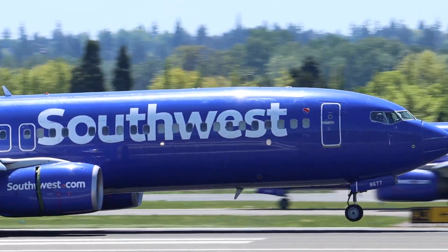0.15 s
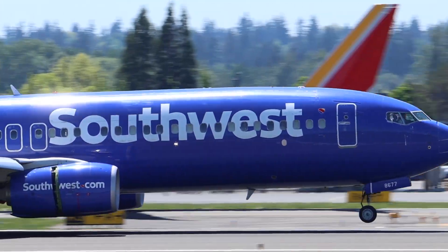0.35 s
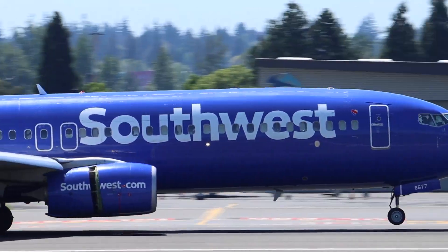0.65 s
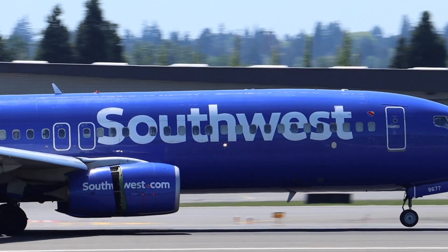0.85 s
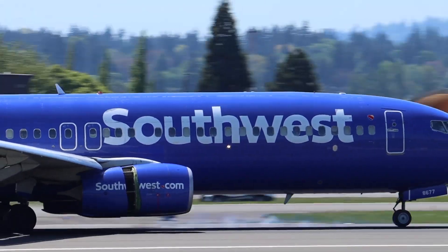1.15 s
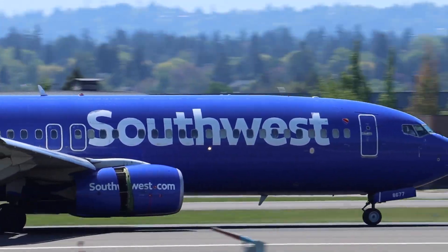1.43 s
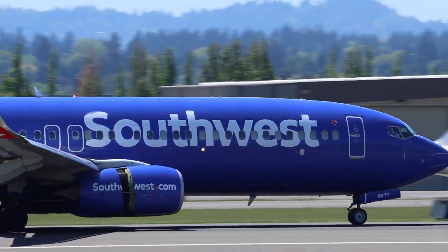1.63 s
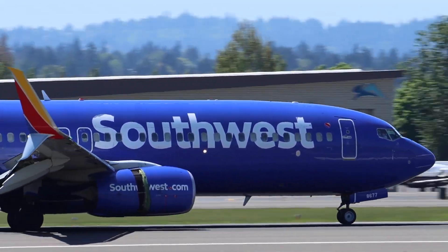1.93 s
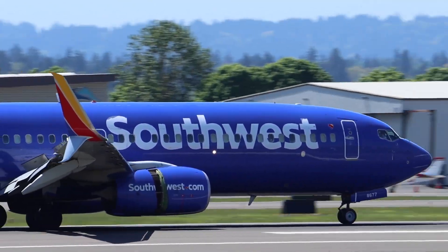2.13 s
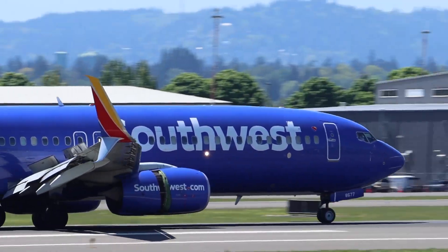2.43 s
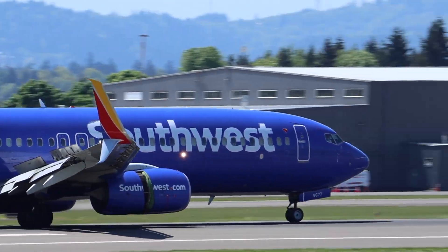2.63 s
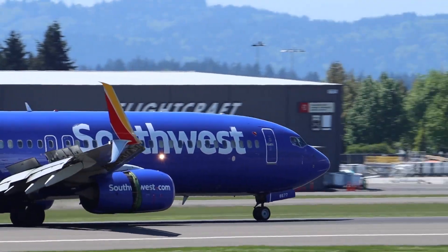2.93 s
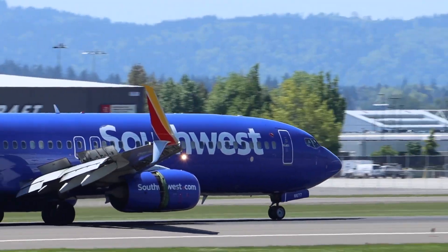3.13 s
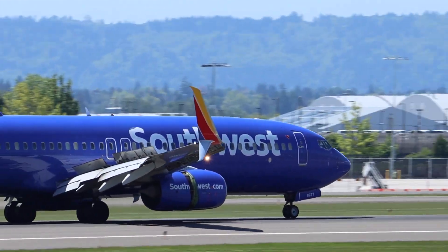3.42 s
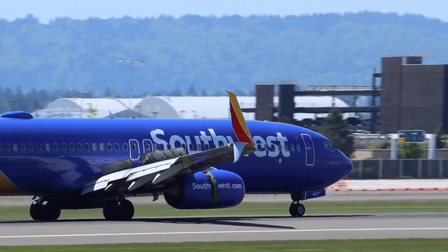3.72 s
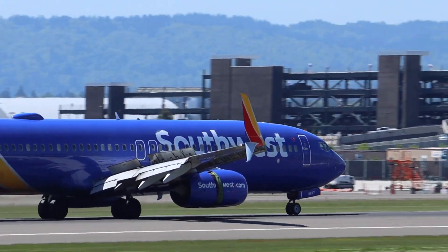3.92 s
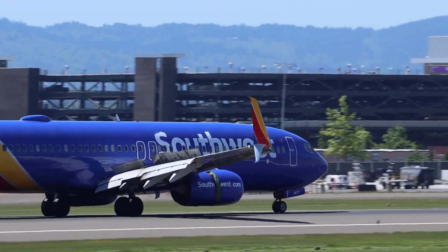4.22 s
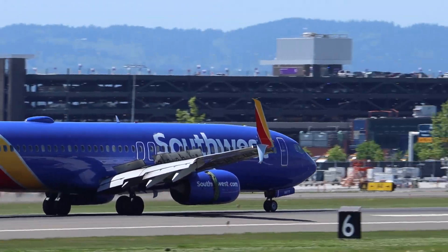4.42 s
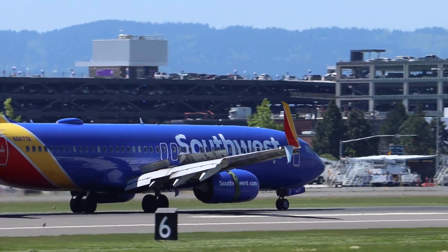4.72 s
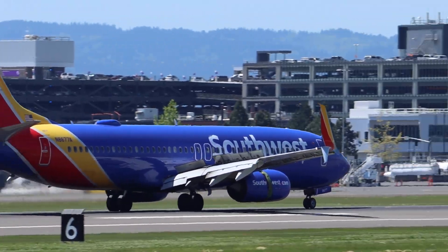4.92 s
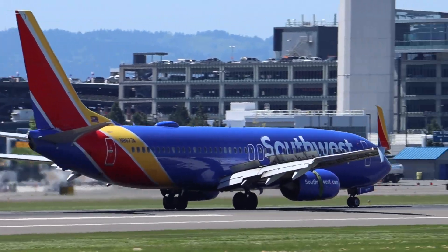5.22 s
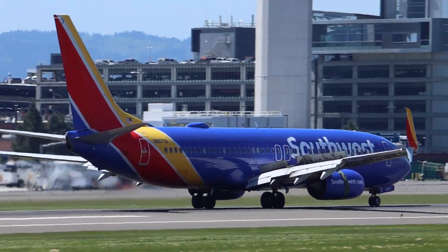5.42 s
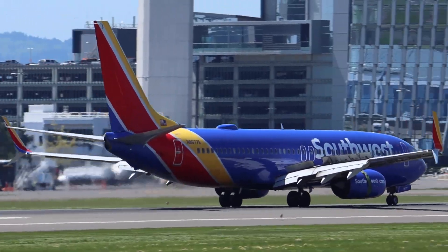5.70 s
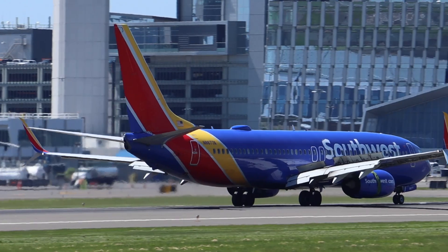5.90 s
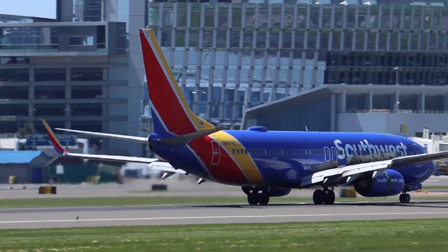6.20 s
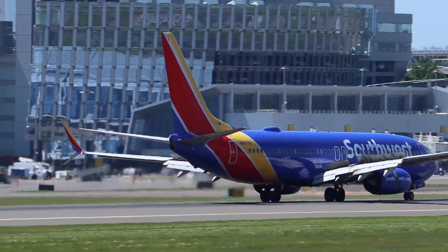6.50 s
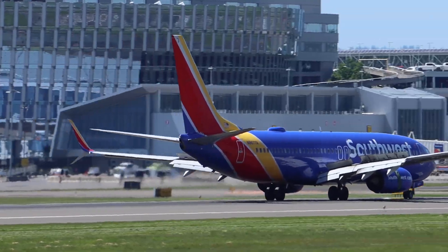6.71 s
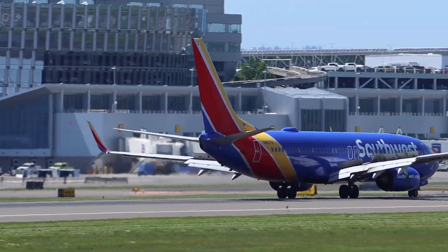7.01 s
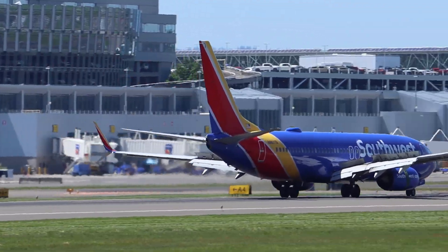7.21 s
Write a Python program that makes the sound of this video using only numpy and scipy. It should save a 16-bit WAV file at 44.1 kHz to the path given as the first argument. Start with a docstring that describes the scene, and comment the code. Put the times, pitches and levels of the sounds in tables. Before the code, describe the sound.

A landed jet airliner's turbulent roar swells unevenly with faint crackle over a deep, surging rumble, gradually losing its treble as it rolls away.

```python
"""A turbulent jet roar with a faint crackle swells and fades over a deep rumble: a twin-engine airliner
has landed and rolls past with its thrust reversers open, heard from across the field.
The roar is shaped noise plus clumps of tiny pressure jumps; a weak, late copy acts as the ground echo.
Its colour slides down in pitch and loses treble as the aircraft rolls away. The rumble is low noise
that surges and sags, and a faint, steady, dull noise is the distant airport."""
import sys
import numpy as np
from scipy import signal
from scipy.fft import rfft, irfft
from scipy.io import wavfile
from scipy.ndimage import uniform_filter1d

SR = 44100
rng = np.random.default_rng(int(sys.argv[2]) if len(sys.argv) > 2 else 0)


def dump_mix(stems):
    """Bounce the given channels to the path in sys.argv[1] as a 16-bit WAV at rate SR."""
    frames = np.atleast_2d(stems).T  # one column per channel
    limited = np.clip(frames, -1, 1)  # hard clip at full scale
    pcm = np.round(limited * 32767).astype(np.int16)
    wavfile.write(sys.argv[1], SR, pcm)


N = 324135   # length in samples

# How the large, slow eddies further down the plume change in loudness.
# Each row: time in seconds, relative level of the low roar in dB, relative level of the deep rumble in dB.
PLUME_LEVELS = [(0, -50, -39.5), (1.78, -37.5, -36.5), (3.25, -40.5, -34.5), (3.92, -35, -35.5),
                (4.16, -33, -30.5), (5.2, -31, -30), (5.8, -28, -30.5), (6.05, -33.5, -32),
                (6.68, -26.5, -29.5), (7.35, -28.5, -33)]


def jet(crackle_db):
    """Jet noise comes from turbulent mixing; small pressure jumps crackle and the ground adds an echo."""
    # How far each part of the roar drifts to the right. Each row: frequency in Hz, share of the full drift.
    lean_share = [(130, .1), (260, .65), (420, .55), (620, 1.1), (1400, 1.4), (2500, 0.35), (4300, 0.027)]
    # Phase lead of the left channel in the top treble. Each row: frequency in Hz, lead in radians.
    left_lead = [(6700, 0), (7300, 0.63), (9000, 0.6)]
    # How much the two channels differ, most in the top treble. Each row: frequency in Hz, # side level against
    # the middle in dB (lowered further towards the treble below).
    side_level = [(200, -21), (600, -24), (2000, -22.5), (6700, -23.5), (7300, -15), (10000, -9)]
    full_lean_db_per_s = 0.23   # right against left, where the share is 1

    mixing = rms_one(ground_echo(rng.standard_normal(N)))
    crackle = shocklets(per_s=560, size_db=2.5, clump_db=3.0)
    side_noise = rng.standard_normal(N)
    # Split the sounds into frequencies and short moments, so that each can get its own level.
    hz, s, (mixing, crackle, side_noise) = signal.stft(
        [mixing, crackle, side_noise], SR, nperseg=1024, noverlap=768)
    hz = np.maximum(hz, 1)

    height = (hz / (hz + 1800))[:, None]   # near 0 in the bass, near 1 in the treble
    crackle_share = from_db(crackle_db) * height
    mid = np.sqrt(1 - crackle_share ** 2) * mixing + crackle_share * crackle
    side_db = at_hz(side_level, hz)[:, None] - 7.8 * height
    side = from_db(side_db) * side_noise

    waver_db = height * twinkle(hz, s, shimmer_db=0.4, flicker_db=1.1)
    gain = rms_one(jet_gain(hz, s)) * from_db(waver_db)
    pan_db = at_hz(lean_share, hz)[:, None] * full_lean_db_per_s * s / 2
    half_lead = np.exp(.5j * at_hz(left_lead, hz))[:, None]   # half of it on each channel
    left = gain * from_db(-pan_db) * half_lead * (mid + side)
    right = gain * from_db(pan_db) / half_lead * (mid - side)
    return signal.istft(np.array([left, right]), SR, nperseg=1024, noverlap=768)[1][:, :N]


def jet_gain(hz, s):
    """Gain of the roar at each frequency and moment: large eddies sound low, fine ones high."""
    # Slow course of the roar at the listener.
    # Each row: time in seconds, relative level of the body in dB, relative level of the hiss in dB.
    roar_levels = [(0, -46.5, -53.5), (.54, -42, -50.5), (.74, -33.5, -44.5), (1.83, -31.5, -40),
                   (2.93, -26.5, -39), (3.34, -31, -43), (3.78, -29, -35), (3.87, -24, -30.5),
                   (5.3, -19.5, -28), (5.76, -17, -26.5), (5.88, -20, -27.8), (6.0, -18.5, -29),
                   (6.12, -23, -32), (6.4, -20.5, -32.5), (7, -17.5, -28.5), (7.35, -17.5, -30.5)]
    # Upper bass against the low roar. Each row: time in seconds, dB near 180 Hz, dB near 300 Hz.
    upper_bass = [(0, -1.5, -2), (.5, 5, 5.5), (1.3, -2.5, -0.5), (1.85, 4, 4), (2.25, -1, -5),
                  (2.75, 3.5, 5), (3.05, -11.5, 5), (3.6, -2, 5), (3.95, 14.5, -6.5), (4.3, 6, 3.5),
                  (5.0, 6, -1.5), (5.85, -.5, -3), (6.25, -6.5, 4.5), (6.55, 0, 1.5), (6.85, -5, -2),
                  (7.2, -0.5, 0)]
    # Colour of the roar before its pitch slides. Each row: frequency in Hz, relative level in dB.
    jet_colour = [(110, -31.5), (190, -16.5), (280, -6), (430, -4), (570, 0.4), (760, 0), (1400, 1),
                  (1930, -3), (2230, -6.5), (3100, -10.5), (4500, -18.5), (6300, -29), (9600, -53.5),
                  (12000, -78.5)]
    doppler_start, doppler_fall_per_s = 1.093, 0.008   # pitch ratio and its steady fall

    body, hiss = at_times(roar_levels, s)
    low_roar, _ = at_times(PLUME_LEVELS, s)
    bass, low_mid = at_times(upper_bass, s)
    course = across([180, 300, 420, 900, 3400],
                    [low_roar + bass, low_roar + low_mid, low_roar, body, hiss], hz)
    level_db = course + swells(hz, s) + shoulder(hz, s) - air_loss(hz, s)

    doppler = doppler_start - doppler_fall_per_s * s
    # The top edge belongs to the air, so the slide weakens above 4200 Hz.
    sliding = np.clip(4200 / hz, 0, 1) ** 4
    colour_db = at_hz(jet_colour, hz[:, None] / doppler ** sliding[:, None])
    return from_db(against_mean(level_db) + colour_db)


def shocklets(per_s, size_db, clump_db):
    """Tiny steep pressure jumps of uneven size, arriving in clumps; rms 1."""
    chance = per_s * from_db(clump_db * drift(14)) / SR
    born = rng.random(N) < chance
    jump_db = size_db * np.minimum(rng.exponential(1, N), 3.5)
    return rms_one(born * from_db(jump_db))


def ground_echo(x):
    """A weak copy by a slightly longer, slowly changing path ripples the spectrum."""
    # The sound reflected by the field, before the lag wavers and the grass dulls it.
    # Each row: time in seconds, lag in milliseconds, level in dB.
    echo_path = [(0, 1.6, -22), (1.2, 1.5, -22), (2.2, 2.0, -18), (3.7, 2.17, -17), (5.0, 2.12, -15.5),
                 (5.7, 2.015, -11.5), (6.2, 1.98, -19), (7.35, 1.92, -16)]
    lag_ms, echo_db = at_times(echo_path, np.arange(N) / SR)
    lag = lag_ms * SR / 1000 * (1 + .008 * drift(2))   # in samples
    grass = signal.butter(1, 2600, fs=SR, output="sos")   # grass swallows the treble
    dulled = signal.sosfilt(grass, x)
    return x + from_db(echo_db) * np.interp(np.arange(N) - lag, np.arange(N), dulled)


def swells(hz, s):
    """Moving air lifts or lowers a region of the roar: a bell in time and pitch that spares the bass; dB."""
    # Single swells, or fades where the dB are negative. Each row: middle in seconds, length in seconds,
    # height in dB (less in the bass), centre frequency in Hz, spread in octaves.
    swell_events = [(0.322, 0.06, 7, 1400, 0.62), (.5, 0.21, 2.5, 650, 0.37), (0.807, .11, 5.5, 653, 0.55),
                    (0.993, 0.14, 6, 2600, 0.95), (1.153, 0.097, -4.5, 6600, 0.6),
                    (1.27, 0.11, 4.5, 6570, 1.2), (1.489, 0.084, 2.5, 1650, 0.42),
                    (1.536, 0.2, 4.5, 3830, .8), (1.553, .1, -6.5, 600, .25),
                    (1.623, 0.029, 7.5, 4800, 0.52), (1.83, .1, -4.5, 620, 0.34),
                    (2.143, 0.34, 7, 1050, 2.03), (2.15, 0.38, 2.5, 820, 0.31),
                    (2.306, 0.045, 3.5, 1410, 0.74), (2.428, 0.27, -4.5, 3400, 0.38),
                    (2.56, 0.085, 7.2, 4900, 1.6), (2.582, .06, 10, 650, 0.18), (2.777, 0.15, 6, 720, 0.62),
                    (2.977, 0.11, 3.5, 7900, 0.58), (2.97, 0.1, -2.5, 2400, 0.22),
                    (3.326, 0.11, -2.5, 2200, 0.39), (3.5, .08, 3, 6000, .7), (3.58, 0.18, -3.5, 700, .4),
                    (3.71, 0.082, -5.5, 1100, 0.28), (3.871, 0.024, 4, 4100, 0.78),
                    (4.074, 0.08, 5.5, 3500, 0.72), (4.339, 0.083, 4.5, 2700, 0.9),
                    (4.485, 0.17, 3.5, 1445, 0.55), (4.487, 0.13, 1.5, 4500, .6),
                    (4.608, .08, -1, 1490, 0.57), (4.671, 0.16, -4, 3700, 0.5),
                    (4.938, 0.3, 3.7, 1800, 1.3), (5.18, 0.18, 4.5, 1465, 0.41),
                    (5.355, .09, 0.5, 1250, .5), (5.455, .25, 3.5, 500, 0.2), (5.524, 0.15, 5.5, 3500, 1.6),
                    (5.573, 0.058, 3.5, 1300, 0.17), (6.098, .12, -1.5, 696, 0.68),
                    (6.247, 0.13, 1.9, 1200, 0.45), (6.37, .1, -1.5, 2800, 0.29),
                    (6.468, .08, 0, 2970, 1.5), (6.7, 0.1, 4, 4410, 0.72), (7.056, .18, 5, 540, .3)]
    reach = 1 / (1 + (480 / hz) ** 6)   # waves below about 480 Hz pass through the air undisturbed
    total_db = 0
    for at, length, db, centre_hz, octaves in swell_events:
        in_pitch = np.exp(-.5 * (np.log2(hz / centre_hz) / octaves) ** 2)
        total_db = total_db + db * np.outer(reach * in_pitch, bell(s, at, length))
    return total_db


def shoulder(hz, s):
    """A narrow hump in the roar that glides with the angle to the jets; dB."""
    # Where the hump lies and how tall it is. Each row: time in seconds, centre in Hz, height in dB.
    hump_path = [(0, 1840, 1), (3, 1750, 1.5), (4.2, 1930, 3.5), (5.6, 1860, 0), (6.1, 1680, 0.5),
                 (6.6, 1610, 2.5), (7.35, 1560, 0.5)]
    centre_hz, height_db = at_times(hump_path, s)
    octaves = 0.16   # spread of the hump
    return height_db * np.exp(-.5 * (np.log2(hz[:, None] / centre_hz) / octaves) ** 2)


def air_loss(hz, s):
    """Air absorbs treble as the aircraft draws away, growing with the square of pitch and of time; dB."""
    receding_from_s = 0.33
    loss_db_per_s2, loss_hz = 0.3666, 7500   # the loss that holds at this frequency
    in_pitch = np.minimum(hz / loss_hz, 1.1) ** 2
    in_time = np.maximum(s - receding_from_s, 0) ** 2
    return loss_db_per_s2 * np.outer(in_pitch, in_time)


def twinkle(hz, s, shimmer_db, flicker_db):
    """Moving air makes the level waver, partly at all frequencies together, partly in patches; dB."""
    at = np.minimum(s * SR, N - 1).astype(int)
    patch_hz = 300 * 2 ** (np.arange(11) / 2)   # half an octave apart
    patches = [drift(8.0)[at] for _ in patch_hz]
    return shimmer_db * drift(6.6)[at] + flicker_db * across(patch_hz, patches, hz)


def rumble(evenness, side_db):
    """The slowest eddies of the plume: low noise that surges and brightens, nearly the same in both ears."""
    # Colour of the deep rumble. Each row: frequency in Hz, relative level in dB.
    rumble_colour = [(10, -33), (22, -22), (32, -15), (42, -19.5), (53, -0.5), (66, 0), (80, 3.5), (100, 0),
                     (118, -1.5), (145, -9.5), (175, -24), (260, -25.5), (600, -83)]
    # Short surges, or sags where the dB are negative. Each row: middle in seconds, height in dB.
    surge_events = [(.9, 0), (1.22, -6), (1.6, 4), (1.8, 1), (2.53, 3), (2.8, -2), (3.78, 3.5), (5.13, 4),
                    (6.68, -1)]
    # How bright the rumble is. Each row: time in seconds, gain of its upper edge in dB.
    upper_edge = [(0, 4), (1.65, -7), (2.2, 0), (3.7, -2), (4.1, 5.5), (4.6, 3), (5.45, 1.5), (6, 0),
                  (7.35, -1.5)]

    s = np.arange(N) / SR
    _, level_db = at_times(PLUME_LEVELS, s)
    for at, db in surge_events:
        level_db = level_db + db * bell(s, at, length=0.11)

    mid = coloured(rumble_colour)
    edge_filter = signal.butter(4, 128, "high", fs=SR, output="sos")
    top = signal.sosfiltfilt(edge_filter, mid)
    mid = mid + (from_db(at_times(upper_edge, s)[0]) - 1) * top

    side_filter = signal.butter(4, 125, "high", fs=SR, output="sos")
    side = from_db(side_db) * signal.sosfilt(side_filter, coloured(rumble_colour))
    # Dividing by part of its own strength evens out the chance ups and downs of the noise.
    strength = np.sqrt(uniform_filter1d(mid ** 2, size=SR // 7))
    pair = np.array([mid + side, mid - side]) / strength ** evenness
    return from_db(level_db) * rms_one(pair)


def airport(level_db):
    """The dull, even wash of the distant airport: long waves reach both ears alike, short ones differ."""
    # Colour of the wash. Each row: frequency in Hz, relative level in dB.
    airport_colour = [(30, -1), (120, -3.5), (260, -2.5), (450, -7.5), (1000, -8.5), (3000, -29.5),
                      (9000, -63)]
    # How wide it sounds. Each row: frequency in Hz, side level against the middle in dB.
    airport_width = [(60, -37), (130, -15), (230, -17), (500, -9.5), (1500, -13.5), (3000, -7.5),
                     (6000, -2)]
    mid = coloured(airport_colour)
    hz = np.maximum(np.fft.rfftfreq(N, 1 / SR), 1)
    side = irfft(rfft(coloured(airport_colour)) * from_db(at_hz(airport_width, hz)), N)
    return from_db(level_db) * np.array([mid + side, mid - side])


def bell(s, at, length):
    """A flat-topped rise and fall, above half its height for the given length."""
    flatness = 2.23   # the higher, the flatter the top and the steeper the flanks
    return .5 ** (np.abs(2 * (s - at) / length) ** flatness)


def drift(rate):
    """Slow chance with spread 1: coarse noise twice through a one-pole low-pass at rate Hz."""
    r = np.exp(-80 * np.pi * rate / SR)   # one coarse step lasts 40 samples
    noise = rng.standard_normal(N // 40 + 2002)
    slow = signal.lfilter([1], [1, -2 * r, r * r], noise)[2000:]   # skip the filter's start
    return np.interp(np.arange(N) / 40, np.arange(len(slow)), rms_one(slow))


def coloured(colour):
    """Steady noise of a given colour; rms 1."""
    hz = np.maximum(np.fft.rfftfreq(N, 1 / SR), 1)
    return rms_one(irfft(rfft(rng.standard_normal(N)) * from_db(at_hz(colour, hz)), N))


def from_db(db):
    """Decibels to gain."""
    return 10 ** (np.asarray(db) / 20)


def rms_one(x):
    """Scale to rms 1."""
    return x / np.sqrt(np.mean(x ** 2) + 1e-20)


def against_mean(level_db):
    """Level curves against their own mean power over time."""
    return level_db - 10 * np.log10(np.mean(from_db(level_db) ** 2, axis=-1, keepdims=True))


def at_times(rows, s):
    """Each column of a curve at the times s."""
    times, *columns = np.transpose(rows)
    return [np.interp(s, times, c) for c in columns]


def at_hz(points, hz):
    """Read a spectrum on a log-frequency axis."""
    points = np.array(points)
    return np.interp(np.log(hz), np.log(points[:, 0]), points[:, 1])


def across(anchor_hz, curves, hz):
    """Blend curves that belong to a few frequencies smoothly over all frequencies."""
    weights = [np.interp(np.log(hz), np.log(anchor_hz), row) for row in np.eye(len(anchor_hz))]
    return np.transpose(weights) @ np.array(curves)


def scene():
    """Roar and rumble over the airport's background."""
    roar = from_db(-20.65) * jet(crackle_db=-5.0)
    deep = from_db(-3.0) * rumble(evenness=0.41, side_db=-23.5)
    return roar + deep + airport(level_db=-43.0)


def record(dry):
    """A faint microphone hiss joins in, and a steep low-pass cuts the top."""
    heard = dry + from_db(-78) * rng.standard_normal((2, N))
    top_cut = signal.ellip(10, .1, 80, 15700, fs=SR, output="sos")   # cutoff in Hz
    return signal.sosfilt(top_cut, heard)


dry = scene()
out = record(dry)
dump_mix(out)
```